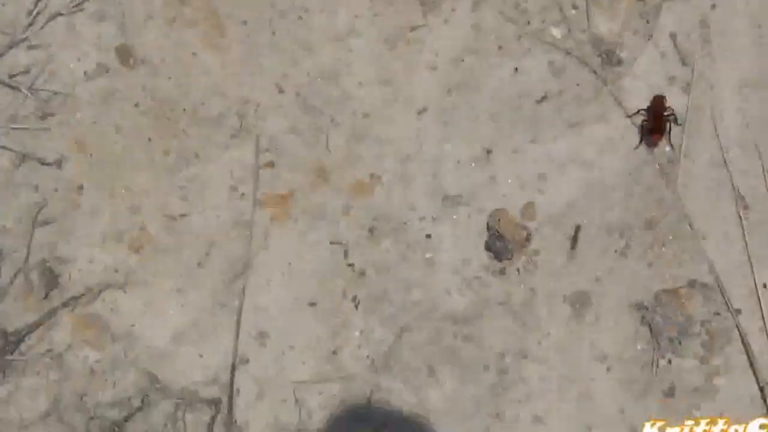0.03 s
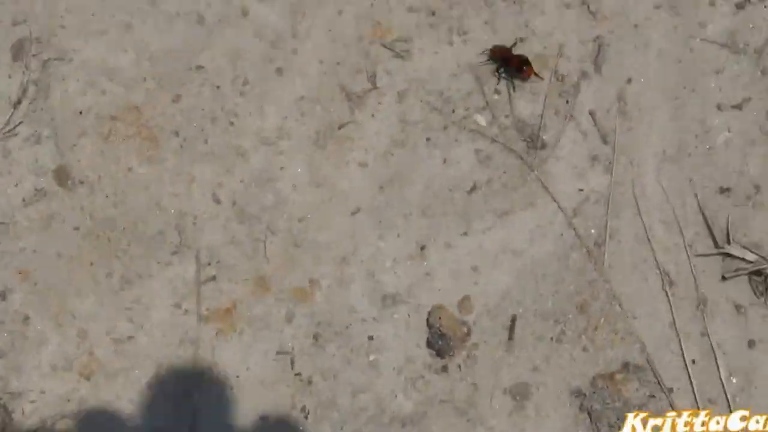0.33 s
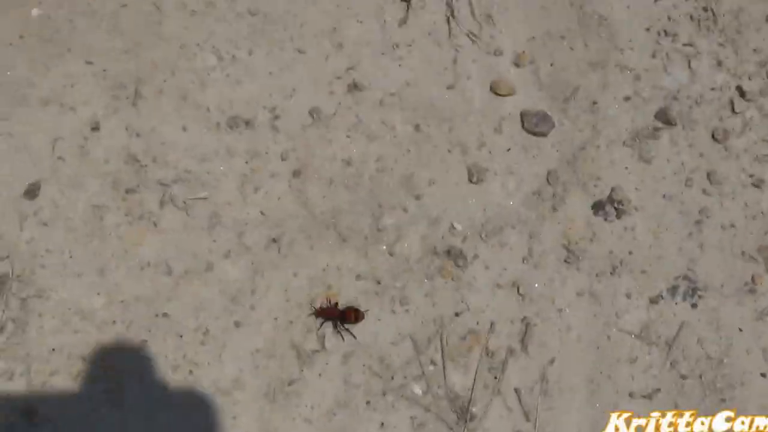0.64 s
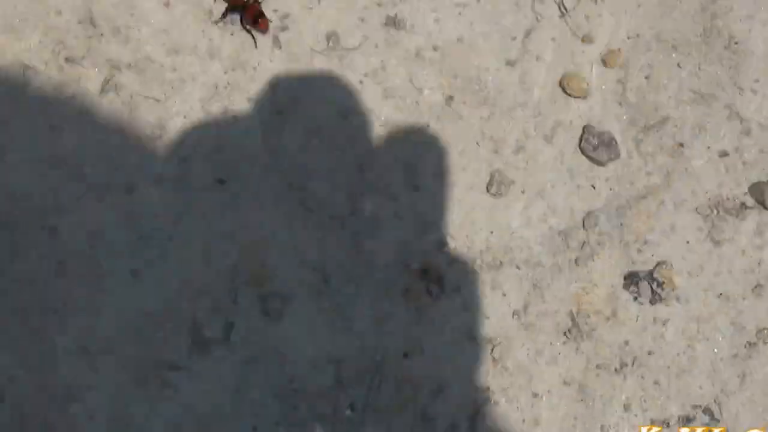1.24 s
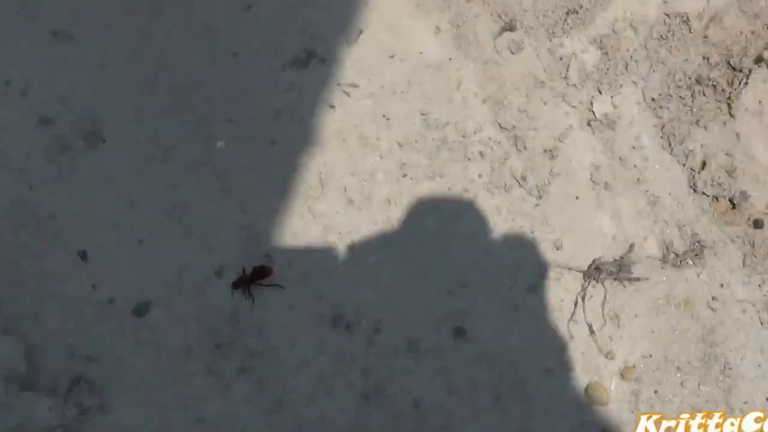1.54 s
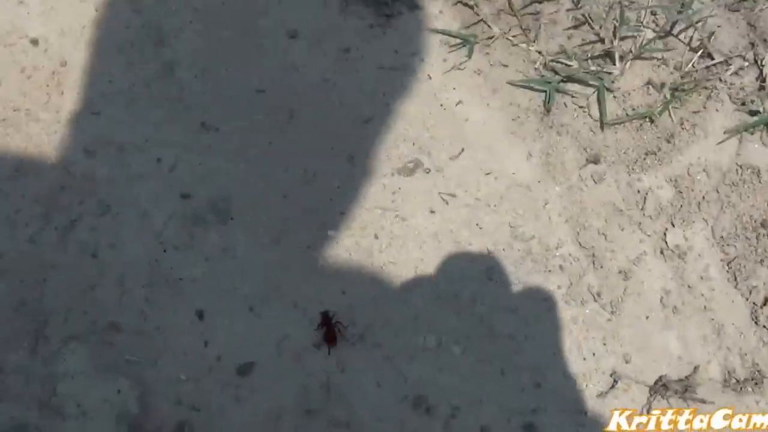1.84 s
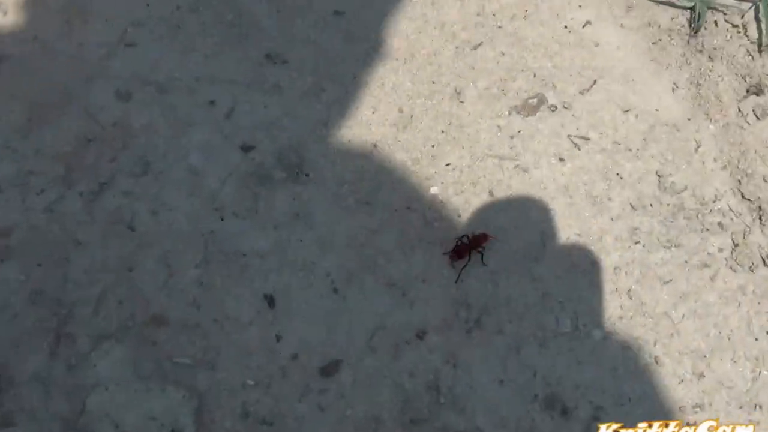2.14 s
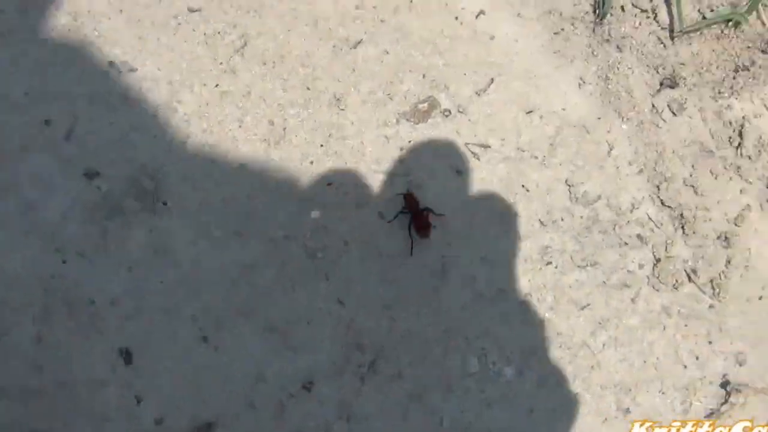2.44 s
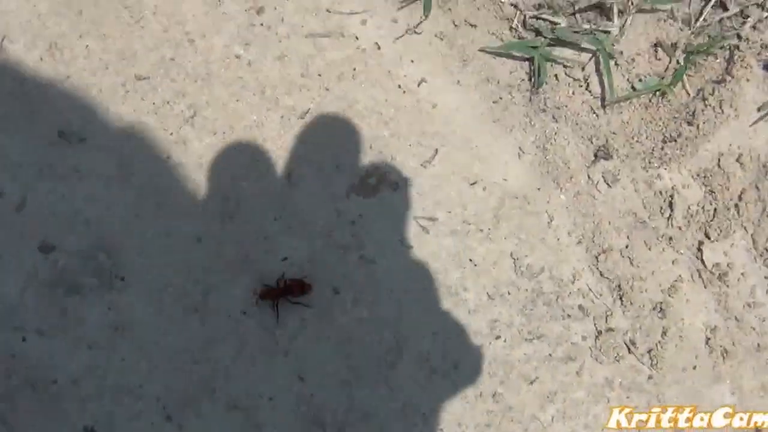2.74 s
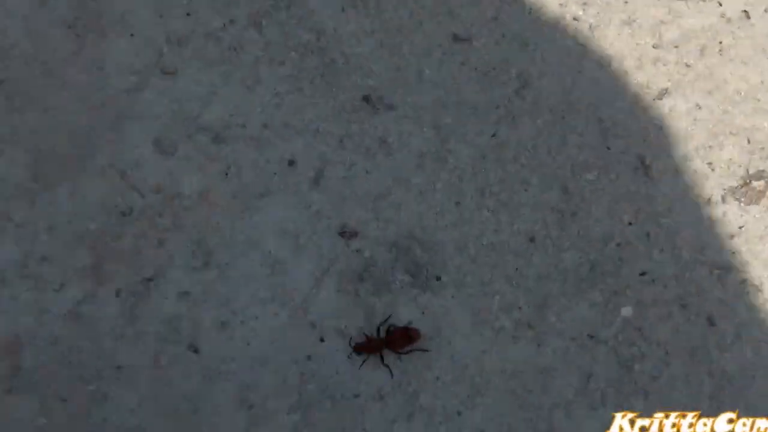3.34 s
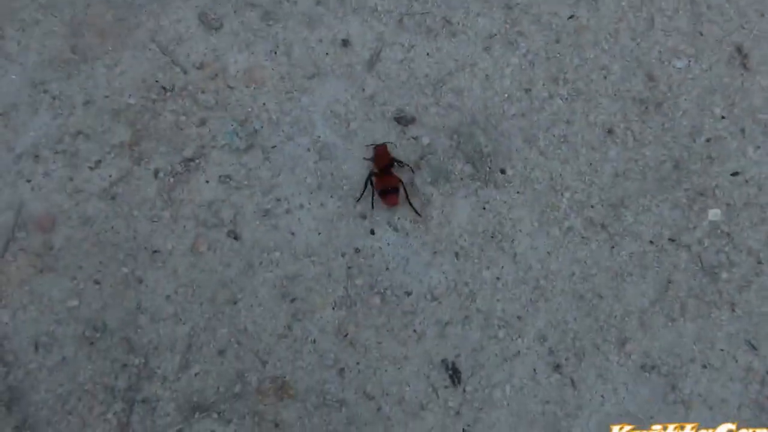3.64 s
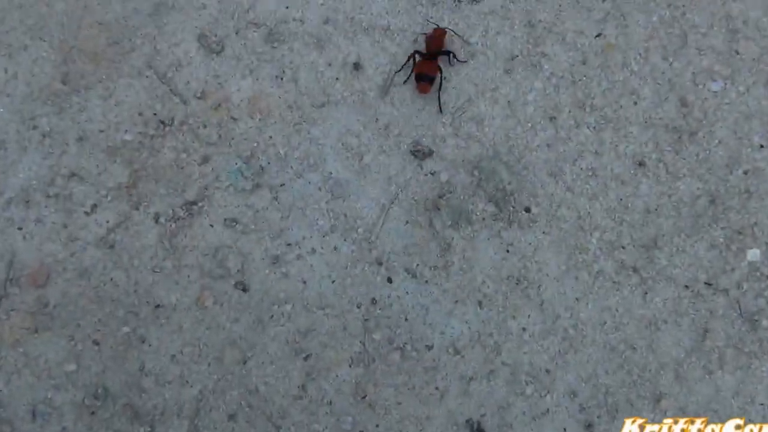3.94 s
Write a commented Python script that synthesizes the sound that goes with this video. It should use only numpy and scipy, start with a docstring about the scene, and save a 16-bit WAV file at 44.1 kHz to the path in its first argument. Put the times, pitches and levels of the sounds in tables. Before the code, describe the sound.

Shoes scuff and crunch on dry sand from about 0.5 to 2 seconds, then again from 2.9 to 3.6, with sharp ticks of grit throughout. Fingers rub and knock the plastic camera case in the first half second and around 1.2; a part snaps into place near 3.9. Light wind rumbles and thumps on the microphone, most after 2.7, over quiet open air and thin, high insect chirps.

```python
"""Shuffling over sand, camera in hand

Shoes scuff dry sandy ground and crack bits of grit. Fingers rub and knock the plastic case, setting
it ringing, and a part snaps into place near the end. Light wind rumbles and thumps on the two
microphone ports. Behind it all lies a bed of quiet open air and thin, high insect sounds."""
import sys
import numpy as np
from scipy import signal
from scipy.fft import rfft, irfft
from scipy.io import wavfile
from scipy.ndimage import uniform_filter1d

SR = 44100
rng = np.random.default_rng(int(sys.argv[2]) if len(sys.argv) > 2 else 0)


def transcribe(signal):
    """Save signal, clipped to [-1, 1], as a 16-bit WAV file at the path in sys.argv[1]."""
    frames = np.atleast_2d(signal).T
    limited = np.clip(frames, -1, 1)
    pcm = np.round(limited * 32767).astype(np.int16)
    wavfile.write(sys.argv[1], SR, pcm)


N = 176400
T = np.arange(N) / SR

# EQ of the open air: f/Hz, relative level/dB
AIR_EQ = [(20, 4), (80, 4.5), (700, -7), (1500, -10.5), (6000, -18), (10000, -19), (15500, -22)]
# diffuse high rasps: peak t/s, rise/s, fall/s, level/dB, f/Hz
HIGH_RASPS = [(.34, 0.34, 0.32, -49, 12300), (1.64, 0.12, 0.27, -49, 12400), (2.376, 0.018, .04, -56, 7120)]
# two thin, gliding, insect-like chirps: t/s, f/Hz, level/dB
CHIRP_GLIDE = [(1.0, 12300, -73), (1.18, 11600, -52.5), (1.29, 13150, -54), (1.35, 12200, -45),
               (1.42, 11900, -97), (2.45, 9900, -73), (2.56, 12100, -49), (2.68, 11900, -57),
               (2.8, 12400, -53), (2.97, 11600, -82)]
# fader ride of the wind rumble: t/s, level/dB
WIND_RIDE = [(0, -33.5), (.05, -47), (.1, -26), (.2, -42), (.39, -35.5), (.52, -53), (.7, -42),
             (1.0, -53.5), (1.55, -57), (1.8, -34.5), (1.96, -37.5), (2.12, -68), (2.66, -58.5),
             (2.76, -30), (2.92, -32.5), (3.1, -23.5), (3.26, -34.5), (3.62, -28), (3.68, -41)]
# EQ of the wind rumble: f/Hz, relative level/dB
WIND_EQ = [(25, -10.5), (45, 0), (70, -3), (105, 0.5), (160, -6), (230, -12.5), (330, -25.5), (600, -38),
           (2000, -51)]
# single eddies thumping the diaphragm: t/s, peak level before the low cut/dB
EDDY_THUMPS = [(0.0922, -25.5), (0.116, -21), (0.263, -29), (0.384, -28), (0.93, -36.5), (1.613, -30.5),
               (1.698, -24.5), (1.812, -24.5), (2.743, -24), (2.812, -18.5), (2.967, -19.5), (3.057, -16.5),
               (3.383, -17), (3.6, -22.5), (3.64, -18.5)]
# grit cracking under a sole, plus one dry tap on the case at 3.58 s: t/s, peak level/dB, centre f/Hz
GRIT_CRACKS = [(0.0498, -10.5, 5060), (0.126, -13.5, 3670), (0.182, -15, 5470), (0.7538, -16.5, 3770),
               (0.8059, -22, 2020), (0.8714, -25, 2050), (1.6208, -16.5, 7200), (1.695, -15, 5400),
               (2.07, -27, 8500), (2.456, -30, 12300), (2.787, -18, 9600), (3.407, -20, 4360),
               (3.58, -19.5, 3430), (3.701, -23, 6650), (3.821, -25, 8400), (3.853, -14.5, 4470)]
# fingers rubbing the case: peak t/s, rise/s, fall/s, level/dB
FINGER_RUBS = [(0.142, 0.031, 0.037, -28), (0.287, 0.038, 0.041, -35), (0.432, 0.035, 0.048, -34)]
# resonances of the plastic case: f/Hz, relative level/dB, t60/s
CASE_MODES = [(338, -11.5, 0.025), (728, 2.5, 0.013), (985, 4.5, 0.0097), (1140, 2.5, 0.015),
              (1690, 5.5, 0.0082), (1954, 5, 0.0038), (2680, 2, 0.0091), (3700, 1, 0.003),
              (4300, -2, 0.0039), (5550, -5.5, 0.0028), (10160, -8, 0.0005)]
# knocks on the case: t/s, relative hollow level/dB, relative clack level/dB, rattle length/s
CASE_KNOCKS = [(0.1423, -7.5, -11.5, 0.0023), (0.151, -6, -9, 0.0045), (0.204, -18, -23, 0.0033),
               (0.31, -24, -19.5, 0.0024), (0.4235, -13, -17.5, 0.0025), (0.439, -14.5, -14, 0.003),
               (0.4512, -27, -19.5, 0.0041), (1.131, -31, -27.5, 0.00087), (1.167, -26.5, -29, 0.0011),
               (1.1875, -24, -26.5, 0.0017), (1.196, -20.5, -20, 0.006), (1.214, -13, -9.5, 0.0015),
               (1.4405, -26.5, -28, 0.0025), (1.733, -19, -31, 0.0029), (2.405, -30.5, -34.5, 0.0012),
               (3.146, -18.5, -23, 0.0035), (3.312, -24.5, -30, 0.00061), (3.5292, -15, -18, 0.0015),
               (3.595, -23.5, -23, 0.00088)]
# shoe strokes: peak t/s, rise/s, fall/s, crunch level/dB, hiss level/dB
SHOE_SCUFFS = [(0.566, 0.046, 0.051, -38, -37), (0.728, 0.02, 0.02, -36, -39),
               (0.808, 0.083, 0.17, -35.5, -39.5), (1.396, 0.11, 0.19, -41, -41.5),
               (1.832, 0.34, 0.22, -41.5, -43.5), (2.942, 0.066, 0.043, -35.5, -42.5),
               (2.977, 0.039, 0.068, -39.5, -37.5), (3.105, 0.015, 0.034, -30, -29.5),
               (3.148, 0.0093, 0.058, -29.5, -36), (3.26, 0.048, 0.26, -43.5, -47),
               (3.439, 0.021, 0.056, -36.5, -40), (3.527, 0.11, 0.11, -39, -43)]
# EQ of the gravel crunch: f/Hz, relative level/dB
CRUNCH_EQ = [(150, -11), (420, 1.5), (800, 1.5), (1400, 2), (1950, -0.5), (3000, -6.5), (6000, -18),
             (16000, -39)]
# EQ of the sand hiss: f/Hz, relative level/dB
HISS_EQ = [(600, -44), (2000, -12.5), (5000, -9), (9800, -7), (12500, -13.5), (16000, -26)]
# ring of the part that snaps into place: f/Hz, level/dB, t60/s
SNAP_MODES = [(880, -10, 0.0094), (2820, -20.5, 0.015), (4330, -11.5, 0.0035), (8600, -19.5, 0.0025)]
# stereo width of each source: side level against mid/dB
WIDTH_DB = {"sand": -10, "grit": -8, "case": -7, "wind": -3, "air": -7}

FINE_SAND, COARSE_GRAINS = (7600, 4.53), (1800, 3.05)  # grains per second, size spread/dB
CASE_TOP_HZ, HIGH_CUT_HZ = 9000, 16100


def from_db(db):
    """Decibels to gain."""
    return 10 ** (np.asarray(db) / 20)


def unit_rms(x):
    """Scale to rms 1."""
    return x / np.sqrt(np.mean(x ** 2) + 1e-20)


def automation(rows):
    """Draw each column as a line through its breakpoints, sample by sample."""
    times, *columns = np.transpose(rows)
    return [np.interp(T, times, column) for column in columns]


def butter(x, order, hz, kind):
    """Low-, high- or band-pass filter."""
    return signal.sosfilt(signal.butter(order, hz, kind, fs=SR, output="sos"), x)


def equalise(x, curve):
    """Shape x with an EQ curve; rms 1."""
    hz, db = np.transpose(curve)
    f = np.maximum(np.arange(N // 2 + 1) * SR / N, 1)
    gain = from_db(np.interp(np.log(f), np.log(hz), db))
    return unit_rms(irfft(rfft(x) * gain, N))


def drift(rate_hz):
    """A smooth random wobble; rms 1."""
    f = np.arange(N // 2 + 1) * SR / N
    return unit_rms(irfft(rfft(rng.standard_normal(N)) / (1 + (f / rate_hz) ** 2), N))


def stereo(pair, source):
    """Spread a mid/side pair to left and right at the source's width."""
    mid, side = pair
    width = from_db(WIDTH_DB[source])
    return (mid + width * side * np.array([[1], [-1]])) / np.sqrt(1 + width ** 2)


def swell(peak_s, rise, fall):
    """An envelope that gains 10 dB per rise time, then loses 10 dB per fall time."""
    return from_db(-10 * np.maximum((peak_s - T) / rise, (T - peak_s) / fall))


def grains(per_s, spread_db, max_spreads=4):
    """Two streams of tiny contacts, mostly small, a few large; rms 1."""
    size = from_db(spread_db * np.minimum(rng.exponential(1, N), max_spreads))
    hits = rng.random(N) < per_s / SR
    return unit_rms(hits * size * rng.choice([-1, 1], (2, N)))


def ring(x, hz, t60):
    """A resonator: a unit click sets off a dying sine of height 1."""
    r, w = from_db(-60 / (t60 * SR)), 2 * np.pi * hz / SR
    return signal.lfilter([0, np.sin(w)], [1, -2 * r * np.cos(w), r * r], x + 1e-18)


def add(out, start_s, sound):
    """Drop a short sound onto the track."""
    i = int(start_s * SR)
    out[:, i:i + sound.shape[1]] += sound[:, :N - i]


def open_air(level_db=-49):
    """A quiet, dark bed of outdoor noise."""
    return from_db(level_db) * stereo(equalise(rng.standard_normal((2, N)), AIR_EQ), "air")


def shrill(hz, width_hz, flutter_db=3.4):
    """A fluttering tone whose pitch jitters so fast that it blurs into a narrow band."""
    jitter = rng.standard_normal((2, N)) * np.sqrt(width_hz * SR / (2 * np.pi))
    pitch = hz + uniform_filter1d(jitter, size=14)
    tone = np.sin(2 * np.pi * np.cumsum(pitch, axis=1) / SR)
    return stereo(unit_rms(tone * from_db(flutter_db * drift(150))), "air")


def insects():
    """Thin high voices: swelling rasps, two gliding chirps and a steady far trill."""
    rasps = sum(from_db(db) * swell(s, rise, fall) * shrill(hz, width_hz=1200)
                for s, rise, fall, db, hz in HIGH_RASPS)
    chirp_hz, chirp_db = automation(CHIRP_GLIDE)
    chirps = from_db(chirp_db) * shrill(chirp_hz, width_hz=380)
    trill = from_db(-63) * shrill(hz=8470, width_hz=360)
    return rasps + chirps + trill


def wind(lumps_db=3, swing_s=0.0013, lag_s=0.00042):
    """Wind buffets the ports with lumpy rumble and push-pull thumps, reaching the right one first."""
    level_db, = automation(WIND_RIDE)
    turbulence = rng.standard_normal((2, N)) * from_db(lumps_db * drift(19))
    mid, side = equalise(turbulence, WIND_EQ)
    side = butter(side, 1, 119, "high")  # higher up, each port feels its own eddies
    rumble = stereo([mid, side], "wind") * from_db(level_db)
    thumps = np.zeros(N)
    for s, db in EDDY_THUMPS:
        swing = (T - s) / swing_s
        thumps -= from_db(db) * swing * np.exp(1 - np.minimum(np.abs(swing), 100))
    left, right = rumble + butter(thumps, 2, 70, "high")
    return np.array([np.interp(T - lag_s, T, left), right])


def grit(splinter_db=-21.5, splinter_s=0.0016, band_ratio=1.78):
    """Each bit of grit cracks under the sole with one sharp tick and a very short splinter."""
    out, t = np.zeros((2, N)), T[:SR // 50]
    for s, db, hz in GRIT_CRACKS:
        crack = from_db(splinter_db) * rng.standard_normal((2, len(t))) * np.exp(-t / splinter_s)
        crack[0, 0] += 1  # the attack sits dead centre
        band = [hz / band_ratio, min(hz * band_ratio, HIGH_CUT_HZ)]
        tick = stereo(butter(crack, 2, band, "band"), "grit")
        add(out, s, from_db(db) * tick / np.abs(tick).max())
    return out


def rubs(damped_t60=0.003):
    """Skin sticks and slips on the case in dry grains; the finger damps its ring."""
    pressure = sum(from_db(db) * swell(s, rise, fall) for s, rise, fall, db in FINGER_RUBS)
    slips = grains(*COARSE_GRAINS)
    body = sum((-1) ** k * from_db(db) * ring(slips, hz, damped_t60)
               for k, (hz, db, _) in enumerate(CASE_MODES))
    return pressure * stereo(unit_rms(body), "case")


def knocks(trim_db=-21, tail_db=-24, tail_s=0.007, hollow_below_hz=1400, spread_db=1.5):
    """A tap sets loose plastic chattering; the low modes of the case ring hollow, the high ones clack."""
    out, t = np.zeros((2, N)), T[:SR // 12]
    for s, hollow_db, clack_db, rattle_s in CASE_KNOCKS:
        force = np.exp(-(t / rattle_s) ** 2 / 2) + from_db(tail_db) * np.exp(-t / tail_s)
        chatter = np.diff(force * rng.standard_normal((2, len(t))), prepend=0)
        knock = 0
        for k, (hz, mode_db, t60) in enumerate(CASE_MODES):
            mode = np.array([unit_rms(ring(stream, hz, t60)) for stream in chatter])
            strike_db = hollow_db if hz < hollow_below_hz else clack_db
            gain = from_db(strike_db + mode_db + spread_db * rng.standard_normal((2, 1)))
            knock += (-1) ** k * gain * mode
        add(out, s, from_db(trim_db) / 2 * stereo(knock, "case"))
    return butter(out, 1, CASE_TOP_HZ, "low")


def pebbles(stones=14, t60_cycles=12):
    """Small stones click together at random, each ringing briefly at its own pitch; rms 1."""
    hits = grains(per_s=260, spread_db=3, max_spreads=3)
    struck = rng.integers(0, stones, N)
    pitches = np.geomspace(600, 2600, stones)
    return unit_rms(sum(ring(hits * (struck == k), hz, t60_cycles / hz) for k, hz in enumerate(pitches)))


def scuffs(pebble_db=-4, waver_db=1.6):
    """Soles drag sand: each stroke is a low crunch with pebbles in it and a bright hiss of fine grains."""
    crunch_power = hiss_power = 0
    for s, rise, fall, crunch_db, hiss_db in SHOE_SCUFFS:
        stroke = swell(s, rise, fall)
        crunch_power += (from_db(crunch_db) * stroke) ** 2
        hiss_power += (from_db(hiss_db) * stroke) ** 2
    gravel = equalise(grains(*COARSE_GRAINS), CRUNCH_EQ)
    crunch = np.sqrt(crunch_power) * unit_rms(gravel + from_db(pebble_db) * pebbles())
    hiss = np.sqrt(hiss_power) * equalise(grains(*FINE_SAND), HISS_EQ)
    return stereo((crunch + hiss) * from_db(waver_db * drift(28)), "sand")


def snap(at_s=3.8572):
    """A part of the case snaps home in one clean blow: a hollow note under short, bright rings."""
    blow = np.zeros(N)
    blow[int(at_s * SR)] = 1
    body = sum(from_db(db) * ring(blow, hz, t60) for hz, db, t60 in SNAP_MODES)
    return butter(body, 1, CASE_TOP_HZ, "low")


def scene():
    """Mix feet, handling and wind up front, air and insects behind."""
    hand_pan = from_db([[0.75], [-0.75]])  # the hand is nearer the left port
    handling = (knocks() + snap() + rubs()) * hand_pan
    return scuffs() + grit() + handling + wind() + open_air() + insects()


def record(dry):
    """A steep high cut on the whole mix."""
    return signal.sosfilt(signal.ellip(10, .1, 80, HIGH_CUT_HZ, fs=SR, output="sos"), dry)


dry = scene()
out = record(dry)
transcribe(out)
```